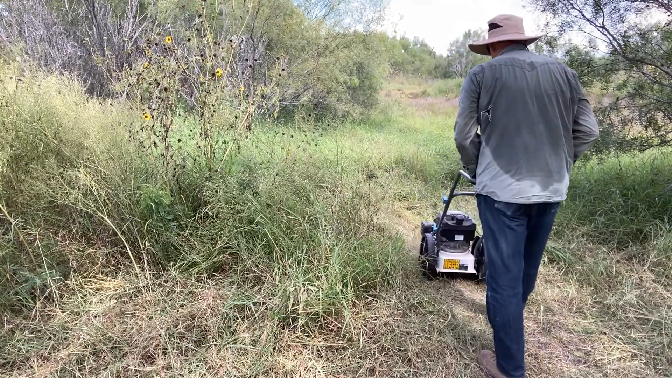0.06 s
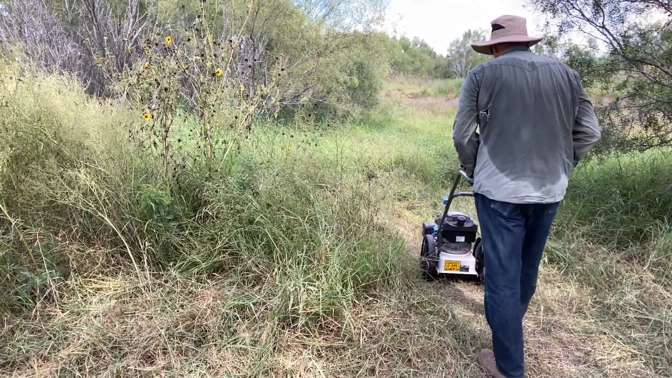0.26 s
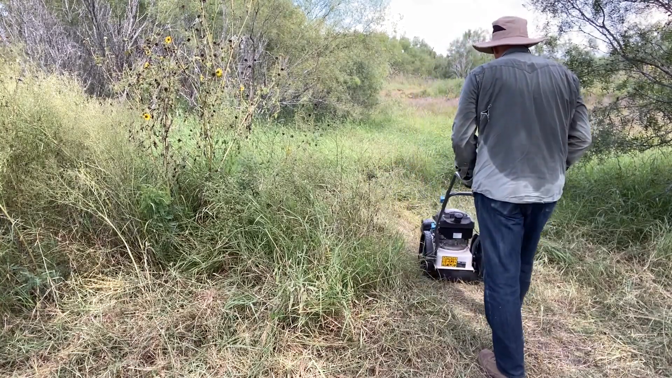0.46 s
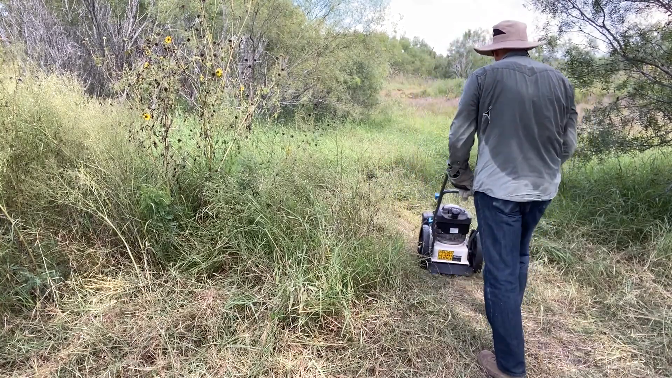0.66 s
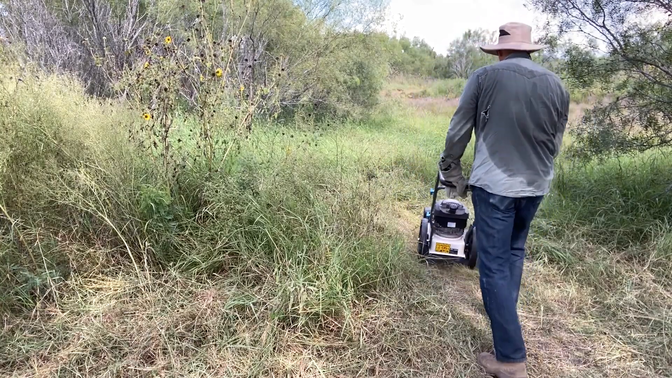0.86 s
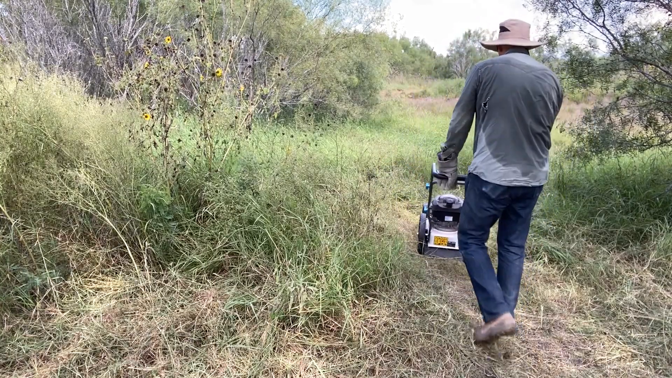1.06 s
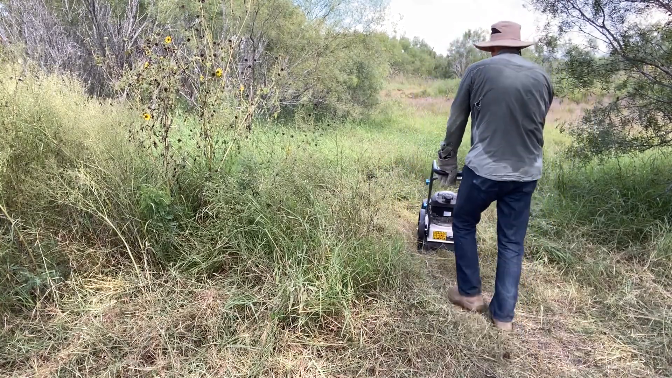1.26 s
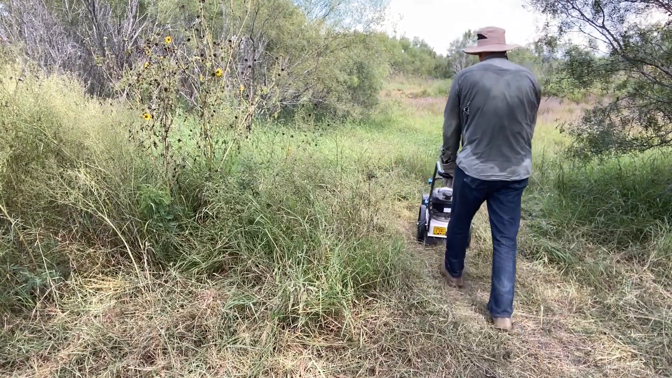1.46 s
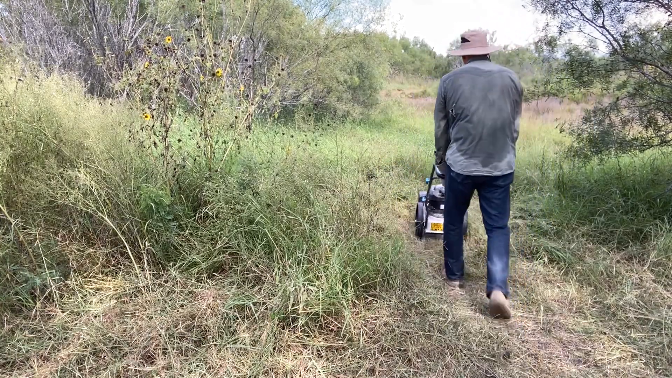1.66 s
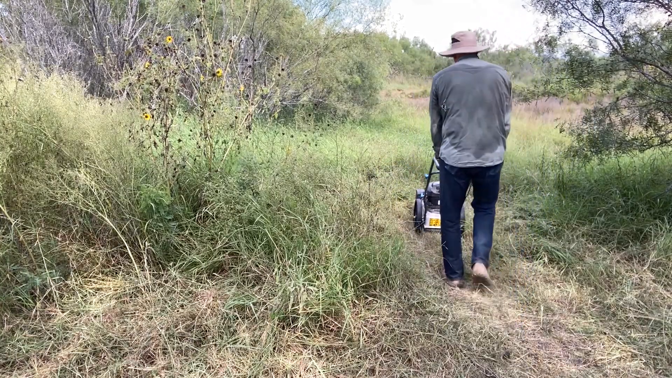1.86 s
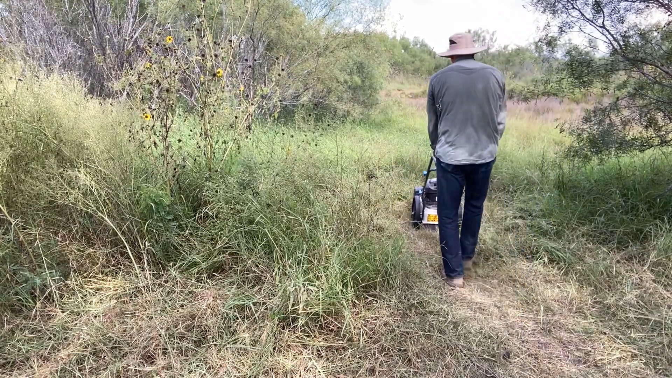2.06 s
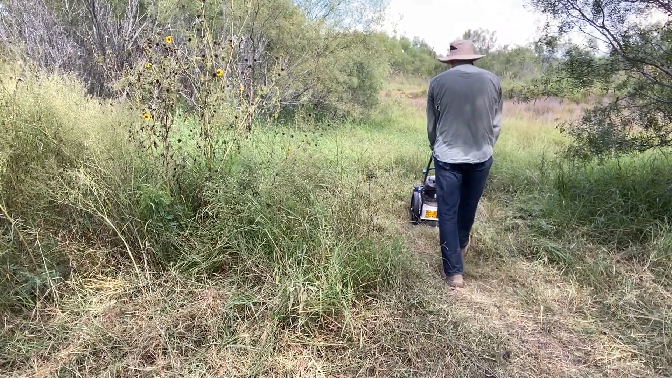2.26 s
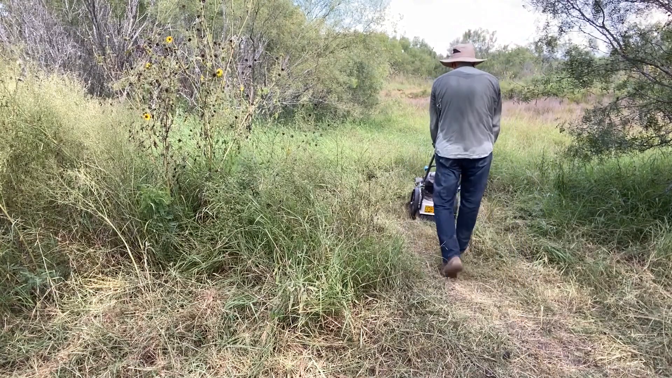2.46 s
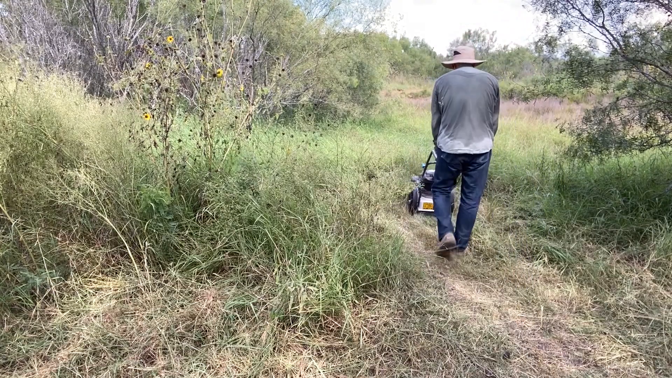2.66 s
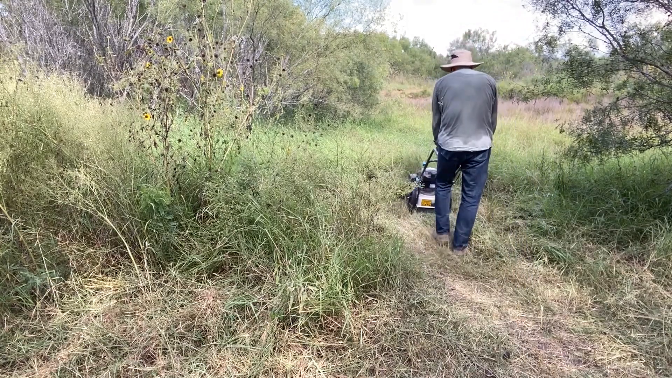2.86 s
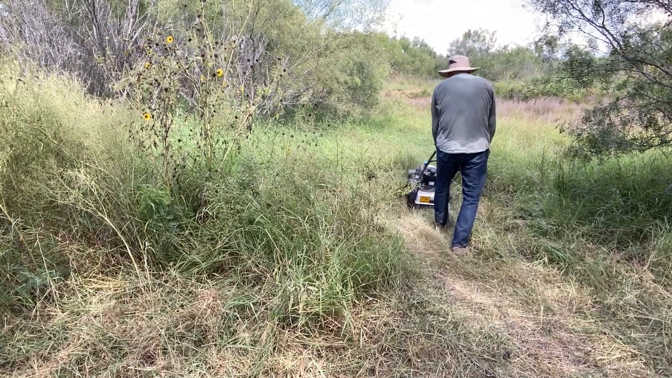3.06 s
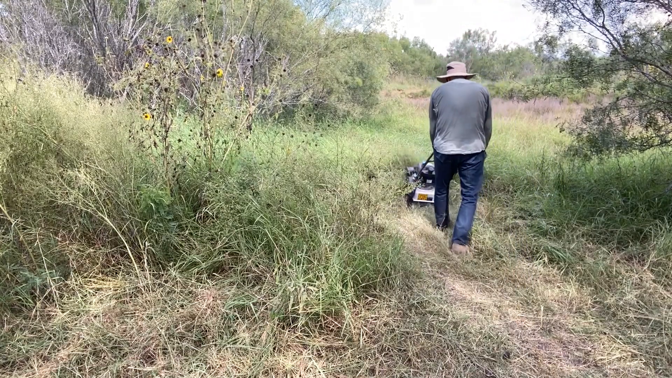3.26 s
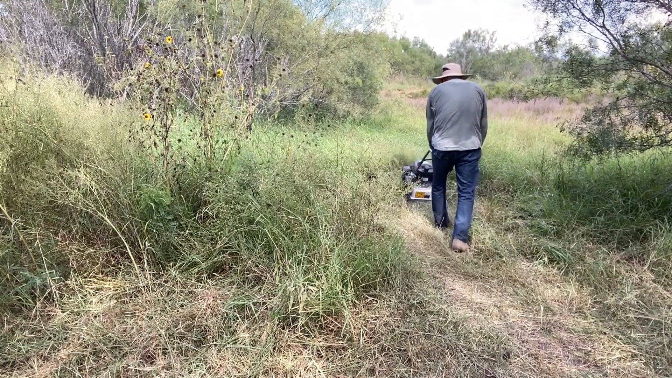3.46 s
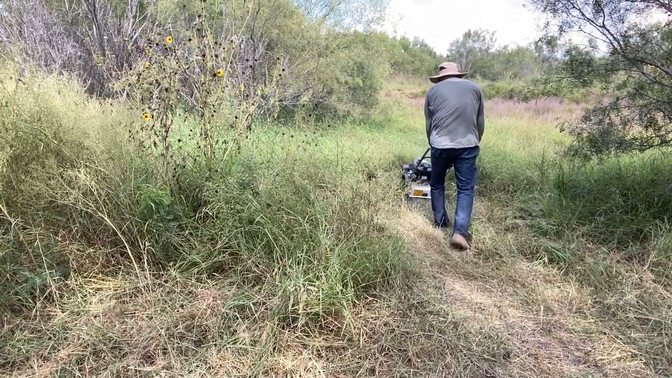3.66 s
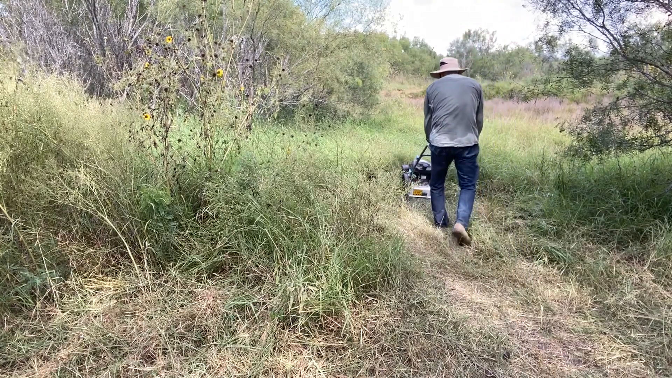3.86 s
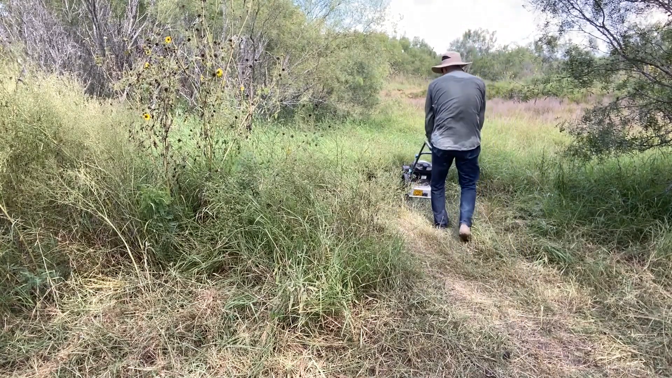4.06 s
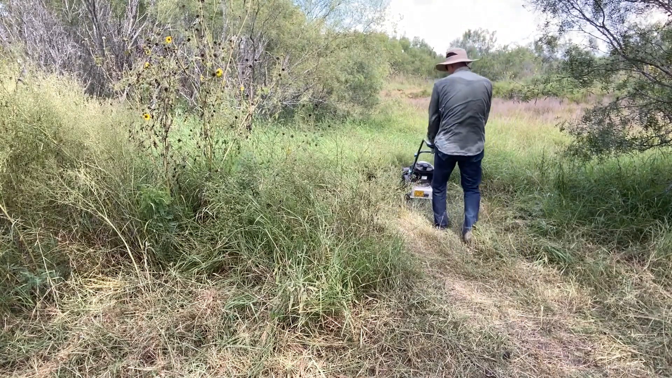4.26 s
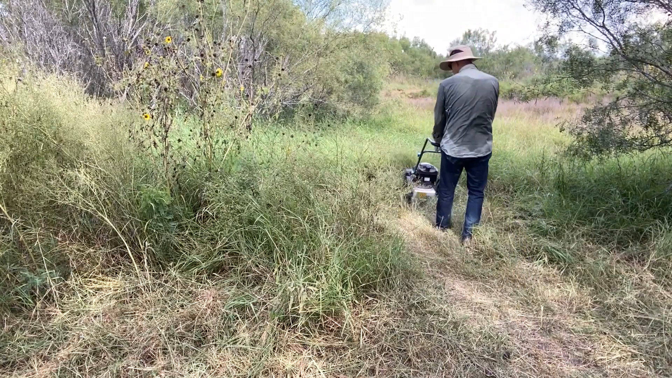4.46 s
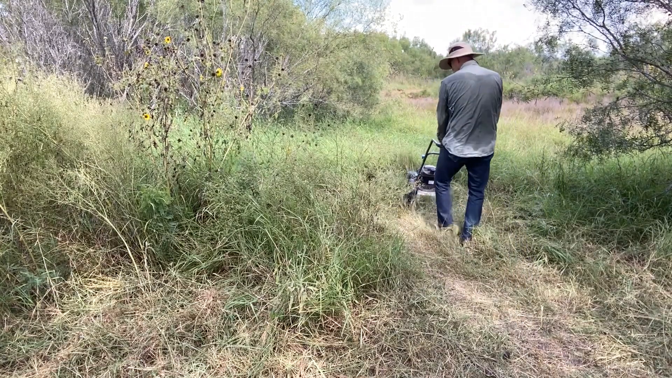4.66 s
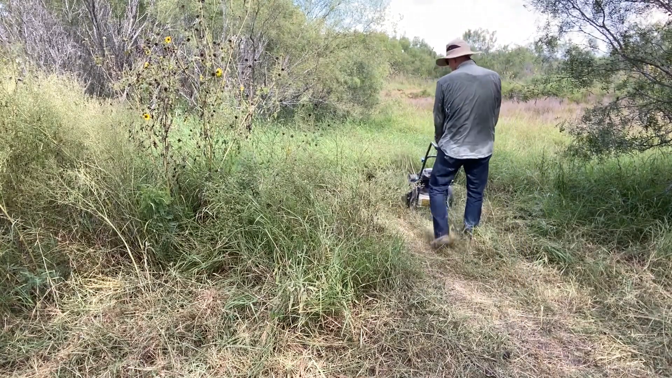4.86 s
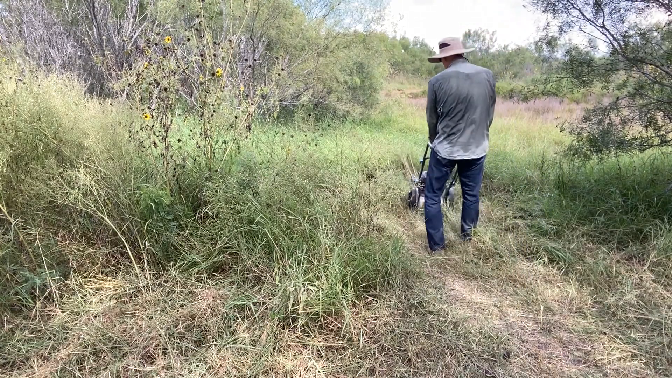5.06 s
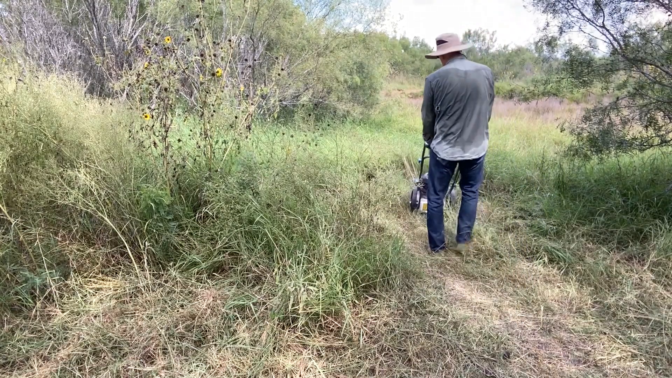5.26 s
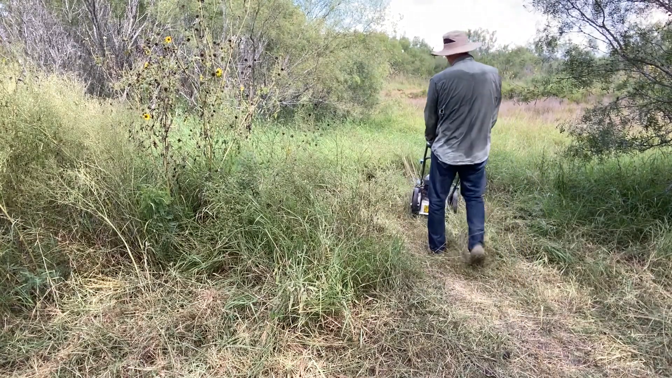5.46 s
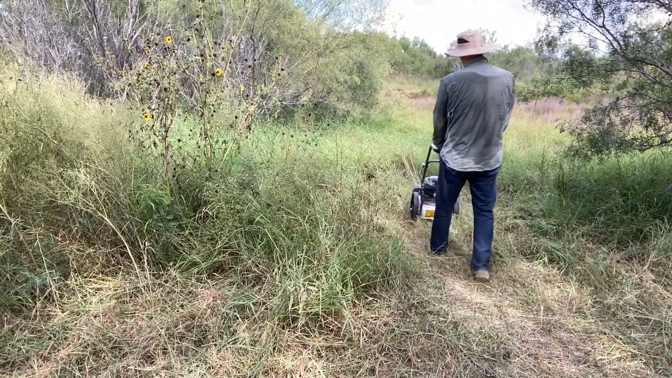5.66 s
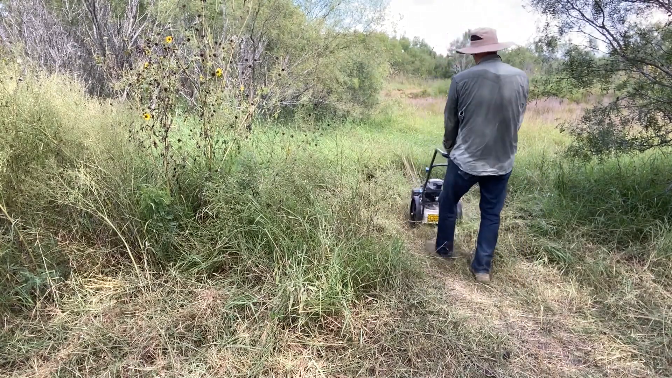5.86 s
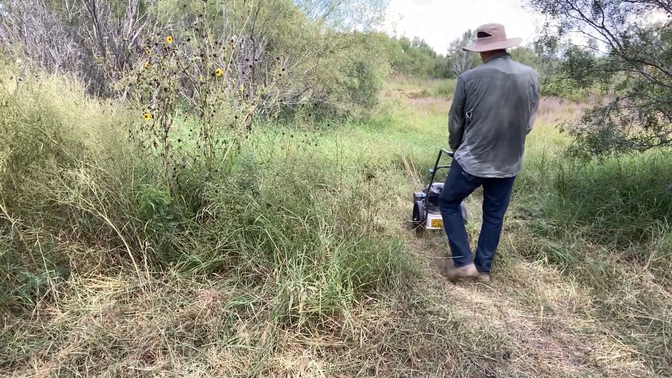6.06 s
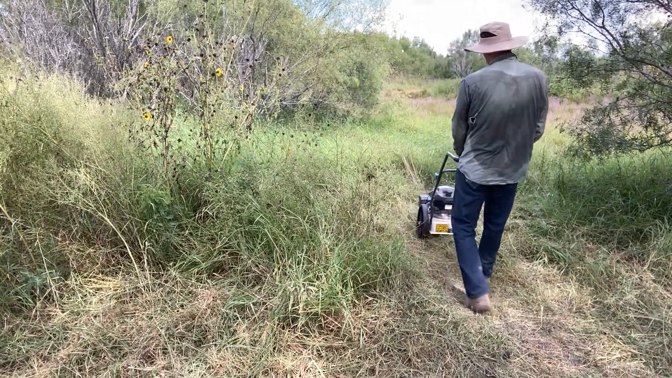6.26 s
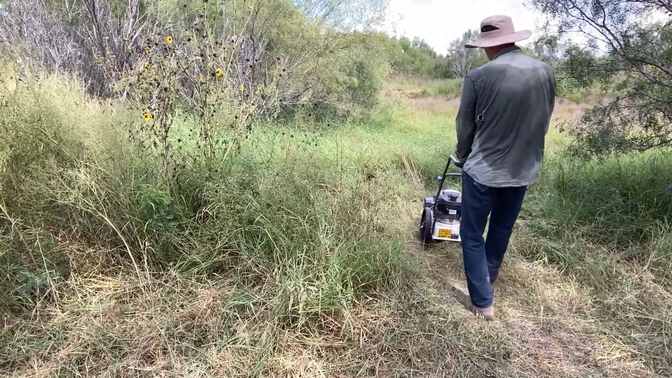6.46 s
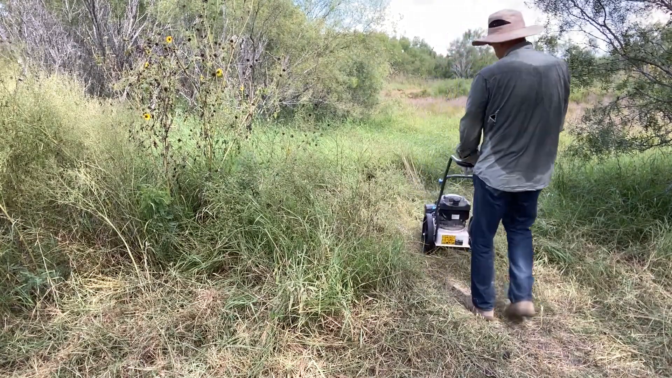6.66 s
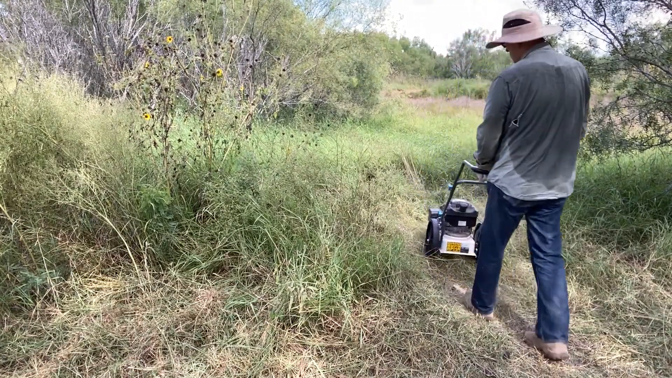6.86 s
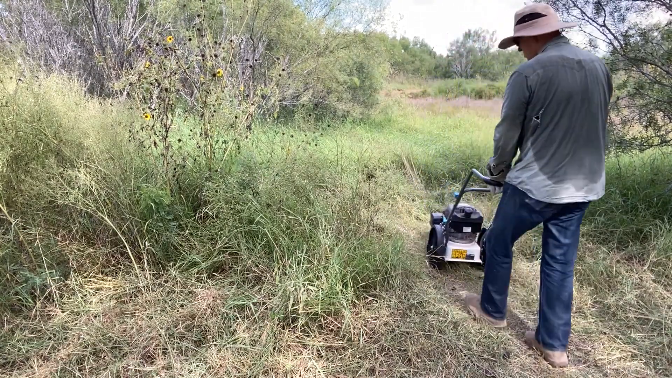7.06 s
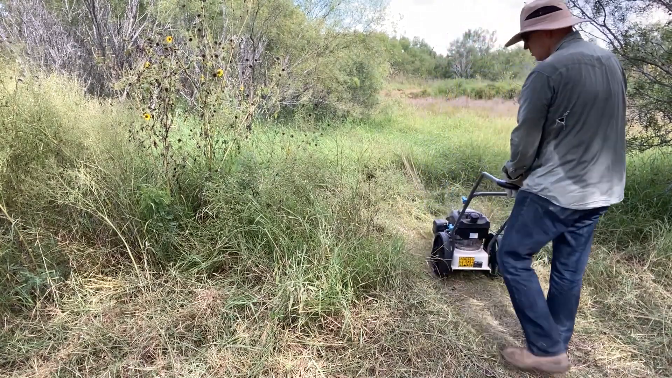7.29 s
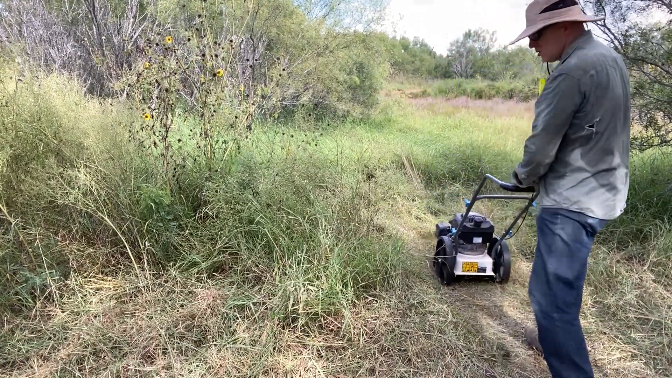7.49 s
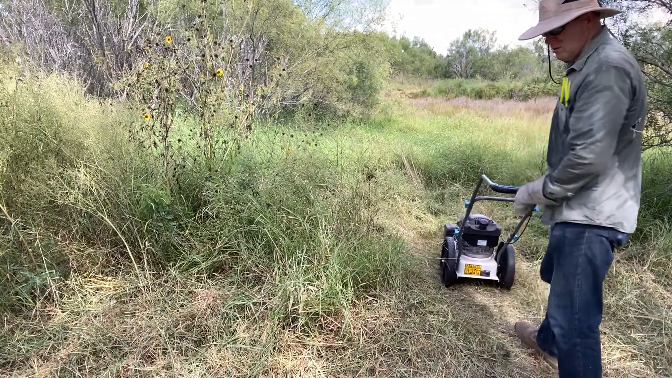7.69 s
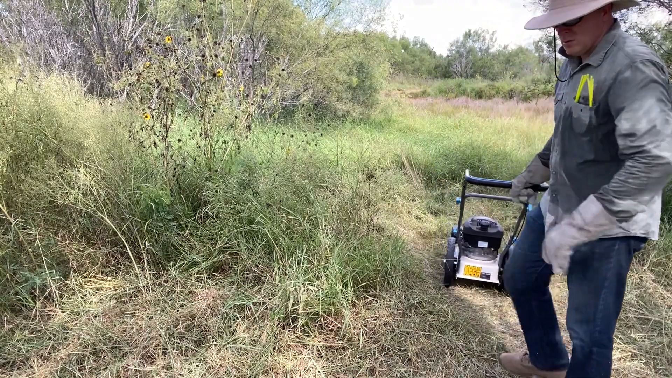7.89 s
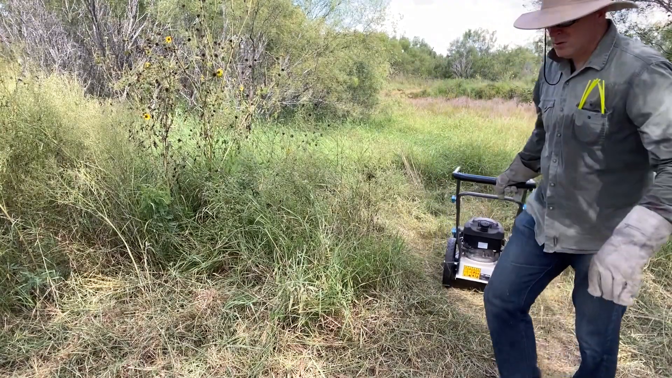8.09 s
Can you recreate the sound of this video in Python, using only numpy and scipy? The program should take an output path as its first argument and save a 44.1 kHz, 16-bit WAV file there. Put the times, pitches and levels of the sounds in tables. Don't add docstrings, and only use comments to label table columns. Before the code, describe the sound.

Grass stalks chop and slap a wheeled string trimmer's metal deck for half a second, then its small engine putters unevenly, rattling, moving away and back.

```python
import sys
import numpy as np
from scipy import signal
from scipy.fft import rfft, irfft, next_fast_len
from scipy.io import wavfile
from scipy.ndimage import uniform_filter1d, map_coordinates

SR = 44100
rng = np.random.default_rng(int(sys.argv[2]) if len(sys.argv) > 2 else 0)


def undo_db(level):
    steps = np.asarray(level, float) / 20
    return 10 ** steps


def wrap_up_sound(samples):
    columns = np.atleast_2d(samples).T
    tamed = np.clip(columns, -1, 1)
    steps = np.round(tamed * 32767).astype(np.int16)
    wavfile.write(sys.argv[1], SR, steps)


N = 358533
T = np.arange(N) / SR
HZ = np.fft.rfftfreq(next_fast_len(N + SR), 1 / SR)
FFT_SIZE = 2 * len(HZ) - 2


def unit(x):
    return x / np.sqrt(np.mean(x ** 2))


def curve(table):
    s, value = np.transpose(table)
    return np.interp(T, s, value)


def on_hz(points):
    hz, value = np.transpose(points)
    return np.interp(np.log(HZ + 1), np.log(hz + 1), value)


def through(x, response):
    return irfft(rfft(x, FFT_SIZE) * response, FFT_SIZE)[..., :N]


def noise(points):
    return unit(through(rng.standard_normal(N), undo_db(on_hz(points))))


def clicks(times, sizes):
    at = np.clip(np.asarray(times) * SR, 0, N - 2)
    i = at.astype(int)
    return np.bincount(i, sizes * (i + 1 - at), N) + np.bincount(i + 1, sizes * (at - i), N)


def fade(tau_s):
    return SR * tau_s / (1 + 2j * np.pi * HZ * tau_s)


def soften(tau_s):
    return 1 / (1 + 2j * np.pi * HZ * tau_s) ** 2


def resonance(hz, width_hz):
    return 1 / (1 + 1j * (HZ ** 2 - hz ** 2) / (HZ + 1) / width_hz)


def ring(modes):
    return sum((-1) ** k * undo_db(db) * resonance(hz, width) for k, (hz, width, db) in enumerate(modes))


def walk(rate_hz):
    k = int(SR / rate_hz)
    return unit(uniform_filter1d(uniform_filter1d(rng.standard_normal(N), k), k))


def stalk_snaps():
    jump_db = np.minimum(2.5 * rng.exponential(size=N // 128 + 1), 7)
    level = np.repeat(undo_db(jump_db), 128)[:N]
    return uniform_filter1d(level, size=96) * rng.standard_normal(N)


# (frequency [Hz], level [dB])
CHOP_COLOUR = [(200, 2), (500, 7.5), (1300, 5), (2500, 0.5), (5000, -9.5), (8000, -9), (12000, -12.5),
               (16000, -17.5)]
CHOP_DB, FREE_S, FREE_DB_PER_S = -29.5, 0.5, 75
CLUMP_S, CLUMP_DB, CLUMP_RISE_S, CLUMP_FALL_S = 0.288, 8.5, 0.061, 0.033


def chop(snaps):
    away = np.where(T < CLUMP_S, (CLUMP_S - T) / CLUMP_RISE_S, (T - CLUMP_S) / CLUMP_FALL_S)
    clump_db = CLUMP_DB * np.exp(-away)
    free_db = FREE_DB_PER_S * np.maximum(T - FREE_S, 0)
    return undo_db(CHOP_DB + clump_db - free_db) * unit(through(snaps, undo_db(on_hz(CHOP_COLOUR))))


# (time [s], overshoot after [cycles/s], sag before [cycles/s])
SURGES = [(-0.131, 4.169, 0.0), (0.346, 0.268, 4.092), (0.816, 0.136, 0.902), (1.313, 0.079, 0.317),
          (1.587, 1.031, 0.051), (2.041, 1.193, 0.335), (2.433, 0.915, 2.605), (3.174, 1.279, 0.722),
          (3.798, 1.3, 2.092), (4.3, 0.419, 0.538), (4.814, 1.781, 1.546), (5.332, 0.329, 0.745),
          (5.702, 1.037, 1.318), (6.357, 0.0, 0.842), (6.595, 1.927, 0.593), (7.122, 0.055, 0.842),
          (7.659, 0.858, 0.605), (7.883, 0.644, 0.0)]
BASE_HZ, CATCH_S, SETTLE_S, SAG_S = 23.191, .02, .601, .215


def speed():
    s, over, sag = np.transpose(SURGES)
    age = T[::128, None] - s
    caught = (1 + np.tanh(age / CATCH_S / 2)) / 2
    swing = over * caught * np.exp(-np.maximum(age, 0) / SETTLE_S)
    swing = swing - sag * (1 - caught) * np.exp(np.minimum(age, 0) / SAG_S)
    return BASE_HZ + np.interp(T, T[::128], swing.sum(axis=1))


MISFIRES = [.34, 1.38, 2.02, 2.61, 3.4, 3.48, 3.74, 3.91, 4.57, 4.66, 4.75, 5.67]
GULPS = [.59, .67, 1.76, 1.85, 2.14, 2.22, 2.35, 3.69, 3.78, 3.99, 4.79, 4.91, 5.54, 6.25, 6.38, 6.51, 6.96,
         7.29, 7.55]
# (time [s], burn [1 full, 0 none, below 0 suck-back])
LEAN = [(.51, 0.18), (1.05, -0.13), (1.17, -0.5), (1.26, 0.21), (1.51, 0.18), (1.6, -0.74), (1.93, -0.24),
        (2.35, -1.3), (2.4, -1.7), (2.44, 0.42), (1.46, 0.68), (5.66, -1.5), (4.74, -1.4), (2.69, 0.31),
        (2.77, 0.28), (2.85, -0.45), (2.94, 0.16), (3.11, 0.41), (3.61, -0.69), (4.11, 0.043),
        (4.45, 0.031), (4.95, 0.11), (5.28, 0.45), (5.83, -0.027), (6.04, 0.32), (6.16, 0.33),
        (6.29, -0.17), (6.55, -0.72), (6.88, 0.31), (7.04, 0.0077), (7.38, 0.08), (7.46, 0.06),
        (7.59, 0.047), (7.68, -0.46), (.08, 0.9), (.29, 0.69), (.41, 0.57), (.74, 0.61), (1.29, 0.64),
        (1.67, 0.85), (2.26, 0.32), (2.47, 0.99), (3.31, 0.46), (3.55, 0.46), (4.27, 0.38), (5.44, 0.62),
        (6.79, 0.28), (7.16, 1), (7.41, 0.88), (7.79, 0.75), (7.87, .7), (7.91, 0.54), (8.04, 0.64)]
# (time [s], burn [1 full])
RICH = [(.54, 1.2), (.62, 1.3), (.83, 1.3), (.91, 1.3), (1.08, 1.2), (1.63, 1.3), (2.09, 1.13), (2.64, 1.5),
        (2.72, 1.14), (2.88, 1.1), (3.14, 1.4), (3.35, 1.2), (3.94, 1.56), (4.14, 1.2), (4.23, 1.14),
        (4.31, 1.1), (4.99, 1.34), (5.36, 1), (5.48, 1.3), (5.86, 1.2), (6.45, 1.4), (6.74, 1.3),
        (6.99, 1.3)]
START_PHASE, MISFIRE_BURN, GULP_BITE = .335, -1.55, .2
THROTTLE_LAG_S, CRISP_AT_BASE, CRISP_PER_HZ, CRISP_PER_BURN = 0.079, 0.29, 0.43, 0.27


def cycles(hz):
    phase = START_PHASE + np.cumsum(hz) / SR
    starts = np.interp(np.arange(int(phase[-1]) + 1), phase, T)
    starts[0] = -START_PHASE / hz[0]

    def cycle_at(s):
        return np.interp(s, T, phase).astype(int)

    burn = (1 + 0.03 * rng.standard_normal(len(starts))) * (starts > 0)
    burn[cycle_at(MISFIRES + GULPS)] = MISFIRE_BURN
    s, odd = np.transpose(LEAN + RICH)
    burn[cycle_at(s)] = odd
    bite = np.ones(len(starts))
    bite[cycle_at(GULPS)] = GULP_BITE

    keep = np.exp(-1 / (THROTTLE_LAG_S * SR))
    over_hz = signal.lfilter([(1 - keep) ** 2], [1, -2 * keep, keep ** 2], hz - BASE_HZ)
    crisp = CRISP_AT_BASE + CRISP_PER_HZ * np.interp(starts, T, over_hz) + CRISP_PER_BURN * (burn - 1)
    return phase, starts, burn, bite, np.clip(crisp, 0, 1)


# (delay in cycle [ms], size, softness [ms])
PUFF_DULL, PUFF_CRISP = (3.0, .19, 1.05), (3.15, .065, .05)
SUCK_BACK, VACUUM_SNAP = (2.9, .265, 2.15), (2.8, .036, .18)
# (delay in cycle [ms], size, softness [ms])
STROKES = [
    (12.0, -.028, .05),
    (14.2, -.68, 3.1),
    (19.4, -.012, .05),
    (28.8, .054, 1.8),
]
# (frequency [Hz], Q)
OUTLET = [(69, 7), (130, 1.8)]
# (frequency [Hz], Q)
CHAMBERS = [(202, 1.7), (388, 4.2)]
# (time [s], blow-down level [dB])
LOAD = [(0, 2.5), (.5, 2.5), (1, 1.4), (1.5, 1.3), (2, 1.4), (2.4, 0.5), (2.8, 1), (3.3, 0.5), (3.7, 0.5),
        (4.2, 0.8), (4.88, 1.2), (5.0, 3), (5.3, 1.5), (5.7, 1), (6.3, 1.3), (6.9, 1.3), (7.5, 1.4),
        (8.13, 2.5)]
SNAP_DB_PER_LOAD_DB, PUSH_DB_PER_LOAD_DB = -1.27, 1.03


def muffler():
    r = 1j * HZ
    response = 1
    for hz, q in OUTLET:
        response = response * (r / hz) ** 2 / (1 + r / hz / q + (r / hz) ** 2)
    for hz, q in CHAMBERS:
        response = response / (1 + r / hz / q + (r / hz) ** 2)
    return response * (1 + undo_db(15.5) * resonance(510, 90))


def exhaust(phase, starts, burn, bite, crisp):
    fired, sucked = np.maximum(burn, 0), np.minimum(burn, 0)
    load_db = np.interp(starts, *np.transpose(LOAD))
    stroke = 1 + 0.14 * rng.standard_normal(len(burn))
    snap = stroke * bite * undo_db(SNAP_DB_PER_LOAD_DB * load_db)
    push = stroke * undo_db(PUSH_DB_PER_LOAD_DB * load_db)
    pulses = [PUFF_DULL, PUFF_CRISP, SUCK_BACK, VACUUM_SNAP] + STROKES
    sizes = [fired * np.maximum(undo_db(load_db) - crisp, 0), fired * crisp, sucked, bite * sucked]
    sizes += [snap, push, snap, push]
    gas = 0
    for (ms, size, soft_ms), each in zip(pulses, sizes):
        pulse = clicks(starts + ms / 1000, size * each)
        gas = gas + rfft(pulse, FFT_SIZE) * soften(soft_ms / 1000)
    gas = irfft(gas * muffler())[:N]
    shake = undo_db(-11.5) * np.sin(2 * np.pi * (2 * phase + 0.64))
    lurch = through(clicks(starts + 0.017, 1 - burn), resonance(56, 22) ** 2)
    return unit(gas) + shake + undo_db(-21.5) * unit(lurch)


# (share of cycle, level into block [dB], level into cover [dB])
KNOCKS = [(.06, -2.5, 0), (0.152, -8.5, -6), (.26, -1, 1), (.33, -3, -3.5), (.47, -12.5, -16),
          (.62, -2.5, -9), (.76, -5, 2.5), (.88, 0.5, -8), (.95, 1, 1)]
# (frequency [Hz], width [Hz], level [dB])
CASING = [(499, 65, 3), (711.3, 22.7, 0.5), (748, 37, -0.5), (875.5, 19, 3), (960, 130, -4),
          (1036.4, 33, 2.5), (1182, 27, 1), (1448, 124, -2.5), (1726, 56, 1), (1853, 54, -9),
          (2106, 68, -6), (2298, 78, -7), (2790, 66, -19), (3260, 110, -14.5), (3720, 500, -18.5)]
# (frequency [Hz], width [Hz], level [dB])
SHIELD = [(3780, 380, -4), (4270, 49, -3), (5050, 180, 1.5), (4600, 720, -8), (7000, 59, -6)]
# (frequency [Hz], level [dB])
RATTLE = [(60, -71), (300, 4), (600, -2.5), (1000, 0.5), (1700, -4.5), (2000, -7), (3000, -12.5),
          (4200, -22), (16000, -58)]


def casing(starts, burn):
    period = np.gradient(starts)
    blows = np.zeros((2, N))
    for share, block_db, cover_db in KNOCKS:
        late, vary = rng.standard_normal((2, len(starts)))
        size = undo_db(2 * vary + 0.36 * np.minimum(burn, 0))
        blow = clicks(starts + share * period + 0.00025 * late, size)
        blows = blows + undo_db(np.array([[block_db], [cover_db]])) * blow
    rubbing = through(blows, fade(0.0011) / 50) + undo_db(-21.0)
    contact = 3.94 * blows + rubbing * rng.standard_normal((2, N))
    body = through(contact[0], ring(CASING[:7])) + through(contact[1], ring(CASING[7:]))
    rattle = undo_db(1 + 0.93 * walk(11)) * noise(RATTLE)
    return unit(unit(body) + rattle), unit(through(contact[1], ring(SHIELD)))


# (frequency [Hz], level [dB])
HISS = [(1000, -8.5), (2500, 3.5), (3800, -2.5), (4700, -0.5), (5800, -2), (7000, -1.5), (8300, -1.5),
        (10400, 0), (11500, -6), (15500, -5.5)]
# (time [s], level [dB])
EFFORT = [(0, 3), (.7, 0.5), (1.5, 0), (2.0, 0), (2.6, 0.5), (3.0, 0.5), (4.0, 0.5), (4.7, 0), (5.0, 0),
          (5.5, -2), (5.8, 1.5), (6.3, 1), (6.8, 2), (7.3, -0.5), (7.8, 0), (8.13, 1.5)]


def hiss(starts, burn):
    vary = undo_db(1.5 * rng.standard_normal((2, len(starts))))
    puffs = clicks(starts + 0.001, 0.31 * np.clip(burn, 0, 1) * vary[0])
    puffs = puffs + clicks(starts + .0085, 0.62 * vary[1])
    swell = 1 + through(puffs, fade(.006))
    return unit(swell * undo_db(curve(EFFORT) + 0.71 * walk(8.6)) * noise(HISS))


def breeze():
    return undo_db(-46 + 3 * walk(3)) * noise([(15, -4), (32, 6), (45, -20), (200, -60)])


# (time [s], peak [dB], ring [Hz])
SLAPS = [
    (0.02, -4, 1010),
    (0.062, 1.5, 1290),
    (0.095, -7, 960),
    (0.277, -1.5, 1030),
    (0.29, -11, 700),
    (0.308, -2, 476),
    (0.414, -2, 985),
    (0.512, -24, 1680),
]


def slaps(snaps):
    out = np.zeros(N)
    for s, db, hz in SLAPS:
        near = slice(int(s * SR), int(s * SR) + SR // 6)
        age = T[near] - T[near][0]
        tone = unit(signal.lfilter(*signal.iirpeak(hz, hz / 160, fs=SR), snaps[near]))
        out[near] += undo_db(db - 23.0) * (1 - np.exp(-age / 0.004)) * np.exp(-age / 0.028) * tone
    return out


# (time [s], peak [dB], ping [Hz])
CHIPS = [(0.0253, -22, 6400), (0.0912, -36, 6630), (0.2254, -37, 6560), (0.248, -16.5, 7100),
         (0.294, -7, 6640), (0.2988, -11, 6920), (0.303, -37, 7060), (0.318, -20, 6500), (0.365, -27, 7000),
         (0.5342, -36, 5860), (1.4067, -33, 6100), (1.951, -37, 6750), (2.0368, -44, 6910),
         (2.465, -30, 6530), (3.002, -31, 6600), (3.2534, -31.5, 6350), (3.337, -31, 6700),
         (3.807, -23.5, 6680), (4.56, -34, 6800), (4.814, -25.5, 6360), (4.86, -33, 6860),
         (5.689, -30, 4300), (5.73, -34, 6850), (6.4018, -31, 7000), (6.536, -37, 5860), (6.571, -26, 3500),
         (7.1906, -29, 4200), (7.2858, -32, 6700), (7.487, -27.5, 4260), (7.5358, -44, 4350),
         (7.5782, -35, 5110), (7.614, -29, 6400), (7.6625, -32, 6150), (7.6975, -26, 4180),
         (7.7807, -27.5, 4270), (7.9448, -26, 6900)]
CHIP_RISE_S, CHIP_T60_S = 0.0008, 0.057


def chips():
    spray = noise([(1500, -4.5), (4000, -10), (5000, -10), (7000, -6.5), (10000, -9.0), (15000, -18)])
    out = np.zeros(N)
    for s, db, hz in CHIPS:
        near = slice(int(s * SR), int(s * SR) + SR // 8)
        age = np.maximum(T[near] - s, 0)
        ping = .6 * np.exp(-age / .006) * np.sin(2 * np.pi * hz * age)
        envelope = np.minimum(age / CHIP_RISE_S, 1) * np.exp(-np.log(1000) * age / CHIP_T60_S)
        out[near] += undo_db(db - 3) * envelope * (spray[near] + ping)
    return out


WHIP_S, WHIP_SPREAD_S, WHIP_DB = 0.43, 0.14, -39.5


def whip(snaps):
    swell = np.exp(-((T - WHIP_S) / WHIP_SPREAD_S) ** 2)
    return undo_db(WHIP_DB) * swell * unit(through(snaps, ring([(6700, 9900, 5), (12800, 630, -3)])))


# (time [s], peak [dB], ring [Hz])
TAPS = [(0.23, -21, 910), (0.82, -26, 970), (0.897, -21, 1020), (0.98, -22, 1080), (1.105, -22, 1020),
        (1.359, -34, 1010), (2.662, -34, 1020), (3.042, -31, 1180), (4.131, -23, 1050), (4.508, -23, 1020),
        (4.851, -25, 851), (5.217, -20, 1170), (6.851, -40, 1080), (6.977, -17, 1000), (7.018, -16, 920),
        (7.285, -20, 1220), (7.39, -26, 750), (7.431, -20, 1690), (7.482, -21, 1170), (7.613, -21, 1520),
        (7.986, -22, 1010)]
# (time [s], peak [dB], ring [Hz])
PINGS = [(0.2483, -36, 4960), (0.2962, -22, 4860), (0.3594, -44, 3930), (0.4394, -41, 5010),
         (1.3224, -39, 4210), (2.1959, -58, 4250), (3.2064, -53, 4240), (4.3714, -55, 4020),
         (4.6894, -53, 3900), (4.8145, -37, 4950), (4.8539, -39, 4350), (5.1642, -51, 5040),
         (5.2061, -52, 4870), (5.6371, -48, 5100), (5.7718, -43, 4300), (5.9794, -52, 4270),
         (6.0661, -49, 4940), (6.102, -52, 5020), (6.3294, -51, 4360), (6.4438, -44, 4260),
         (6.6144, -39, 4260), (6.6548, -43, 4230), (7.7403, -34, 4280), (8.0167, -37, 4260)]
TAP_DB, TAP_FALL_S, PING_DB, PING_FALL_S = 0, 0.0035, 2.5, 0.016


def taps_and_pings():
    out = np.zeros(N)
    for table, gain_db, fall_s in [(TAPS, TAP_DB, TAP_FALL_S), (PINGS, PING_DB, PING_FALL_S)]:
        for s, db, hz in table:
            near = slice(int(s * SR), int(s * SR) + SR // 12)
            age = np.maximum(T[near] - s, 0)
            envelope = (1 - np.exp(-age / 0.00048)) * np.exp(-age / fall_s)
            out[near] += undo_db(db + gain_db) * envelope * np.sin(2 * np.pi * hz * age)
    return out


# (time [s], length [s], frequency [Hz], level [dB])
SYMPATHY = [(.45, .95, 1040, 0), (3.9, .95, 1040, 0), (5.85, .5, 1040, -4), (6.85, .4, 1040, -3),
            (7.6, .5, 1040, -3), (.4, .8, 1706, -5), (2.55, 1.1, 1706, -3), (3.85, .6, 1706, -4),
            (5.7, .7, 1706, -6), (6.8, 1.3, 1706, -5), (.75, 1.2, 1165, -4), (2.6, .8, 1165, -5),
            (4.85, .5, 1165, -4), (6.5, .7, 1165, -5), (.4, 1., 740, -5), (2.55, .5, 740, -3),
            (5.9, .7, 740, -5), (.5, .45, 900, -4), (3.95, .7, 900, -5), (4.05, .5, 960, -5)]
SYMPATHY_DB, SYMPATHY_WIDTH_HZ, SYMPATHY_EDGE_S = -10.5, 13.2, 0.086


def sympathy(starts, burn):
    kicks = clicks(starts + .0015, np.clip(1.0 + 0.25 * burn, .2, 1.2))
    out = 0
    for panel_hz in sorted({row[2] for row in SYMPATHY}):
        gate = np.zeros(N)
        for s, length_s, hz, db in SYMPATHY:
            if hz == panel_hz:
                inside_s = np.minimum(T - s, s + length_s - T)
                gate += undo_db(db) * np.clip(inside_s / SYMPATHY_EDGE_S, 0, 1)
        out = out + gate * unit(through(kicks, ring([(panel_hz, SYMPATHY_WIDTH_HZ, 0)])))
    return out


# (frequency [Hz], share [0-1])
LOOSE = [(50, .04), (200, .015), (1000, .04), (1700, .05), (2700, .1), (3300, .17), (3800, .5), (4400, .25),
         (5000, .13), (5600, .42), (6200, .28), (7200, .7), (7900, .45), (8750, .035), (9400, .03),
         (11000, .16), (11900, .05), (13300, .24), (14400, .045), (15500, .17)]
# (frequency [Hz], phase [rad])
LEAD = [(60, -.15), (150, -.3), (350, -.65), (600, -.75), (1030, -.75), (1460, -1), (2300, -2.1),
        (3010, -2.55), (5170, -3.5), (6200, -5.7), (7060, -6.3), (7700, -4), (8350, -3.5), (9100, -3.14),
        (9600, -2.8), (10700, -1.4), (11600, -.1), (12200, .05), (13000, 1.2), (14200, 2.9), (14800, 3.2),
        (15500, 3.7)]
# (frequency [Hz], level [dB])
TILT = [(60, 2), (200, 2), (380, .5), (750, -2.5), (1290, -.5), (1700, 1.5), (2400, 0), (5200, 0),
        (6300, 3), (7300, 2.5), (8500, 0), (15000, 0)]
SCATTER_S = .007


def ports(x, lag_samples):
    loose = np.clip(on_hz(LOOSE), 0, 1)
    half = undo_db(on_hz(TILT) / 2) * np.exp(1j * on_hz(LEAD) / 2)
    direct = through(x, np.array([half, 1 / half]) * np.sqrt(1 - loose))
    long_waves = through(direct[0], 1 / (1 + (HZ / 6200) ** 16))
    late = map_coordinates(long_waves, [np.arange(N) - lag_samples], order=3, mode="nearest")
    direct[0] += late - long_waves
    sway = 6 * np.array([walk(40), walk(40)])
    blades = rng.standard_normal((2, 2, 2048)) * np.exp(-T[:2048] / SCATTER_S)
    paths = rfft(blades * np.sqrt(2 / SCATTER_S / SR), FFT_SIZE) * np.sqrt(loose)
    return direct + through(x * np.cos(sway), paths[0]) + through(x * np.sin(sway), paths[1])


# (time [s], distance [m])
DISTANCE = [(0, 2.77), (.7, 2.74), (1.4, 3.28), (2.4, 3.88), (3.6, 4.54), (4.5, 4.54), (5.5, 3.9),
            (6.3, 3.5), (7.1, 2.56), (7.9, 2.18), (8.13, 3.26)]
# (level at 3 m [dB], loss per doubling [dB])
EXHAUST_DB, CASING_DB, SHIELD_DB, HISS_DB = (-23, 3), (-31, 6.5), (-48.5, 16.5), (-39, 4.5)
CASING_DB_PER_HZ = 0.76
LAG_NEAR, LAG_PER_DOUBLING = 0.82, -1.9


def scene():
    snaps = stalk_snaps()
    hz = speed()
    phase, starts, burn, bite, crisp = cycles(hz)
    doublings = np.log2(curve(DISTANCE) / 3)

    def gain(level, extra_db=0):
        at_3m_db, loss_db = level
        return undo_db(at_3m_db - loss_db * doublings + extra_db)

    cutting = chop(snaps) + slaps(snaps) + chips() + whip(snaps)
    body, shield = casing(starts, burn)
    body = body + undo_db(SYMPATHY_DB) * sympathy(starts, burn)
    engine = gain(EXHAUST_DB) * exhaust(phase, starts, burn, bite, crisp)
    engine = engine + gain(CASING_DB, CASING_DB_PER_HZ * (hz - hz.mean())) * body
    engine = engine + gain(SHIELD_DB) * shield + taps_and_pings()
    mix = cutting + engine + gain(HISS_DB) * hiss(starts, burn) + breeze()
    return ports(mix, LAG_NEAR + LAG_PER_DOUBLING * doublings)


def low_pass(x):
    return signal.sosfilt(signal.butter(12, 15900, fs=SR, output="sos"), x)


def record(dry):
    rounded = np.tanh(0.99 * dry) / 1.375
    bass_cut = signal.butter(3, 40, "high", fs=SR, output="sos")
    mix = through(signal.sosfilt(bass_cut, rounded), HZ < 15700)
    return low_pass(mix)


dry = scene()
out = record(dry)
wrap_up_sound(out)
```